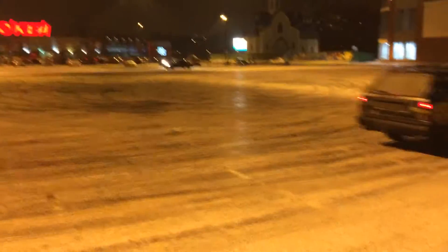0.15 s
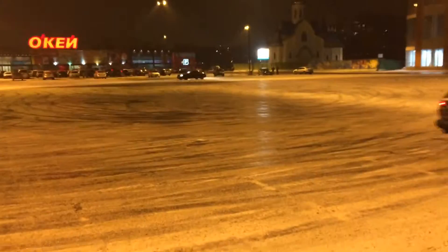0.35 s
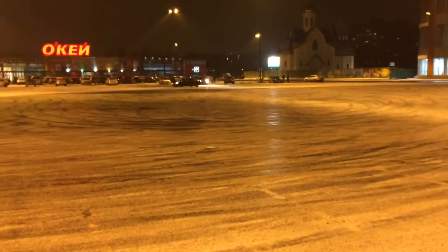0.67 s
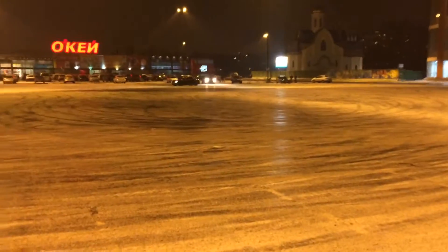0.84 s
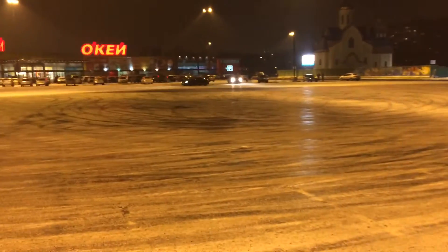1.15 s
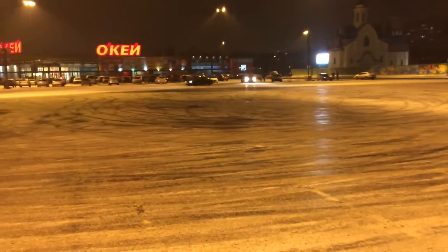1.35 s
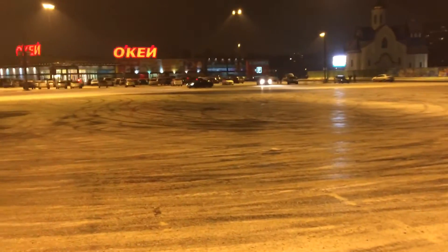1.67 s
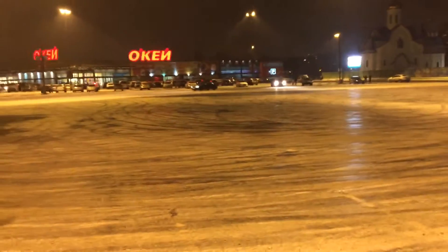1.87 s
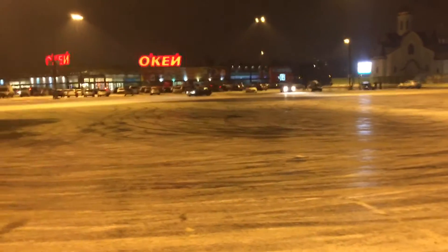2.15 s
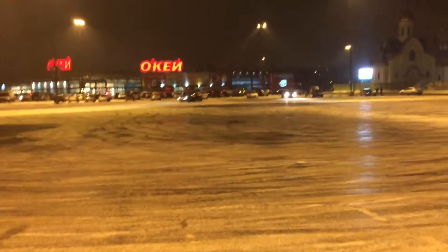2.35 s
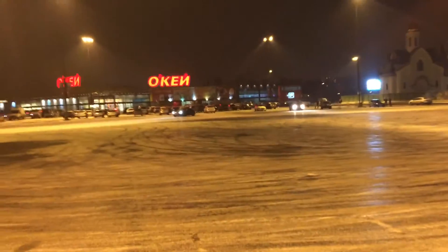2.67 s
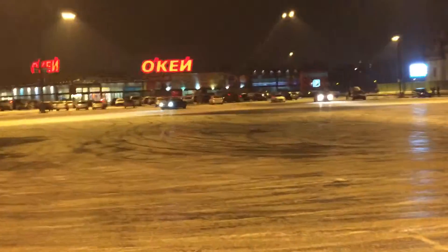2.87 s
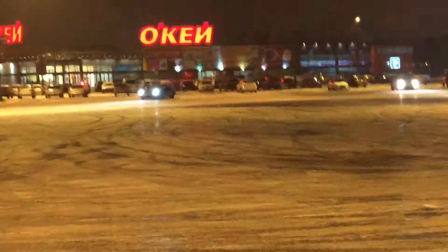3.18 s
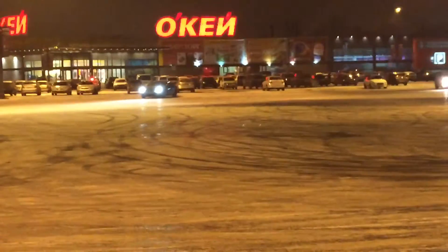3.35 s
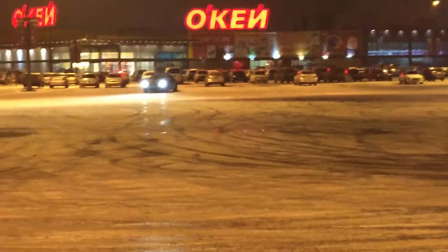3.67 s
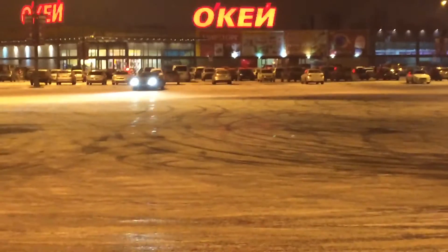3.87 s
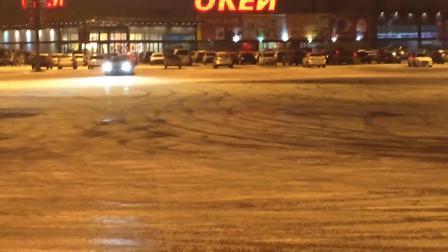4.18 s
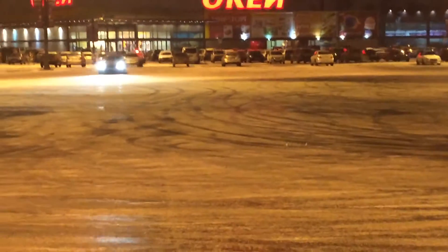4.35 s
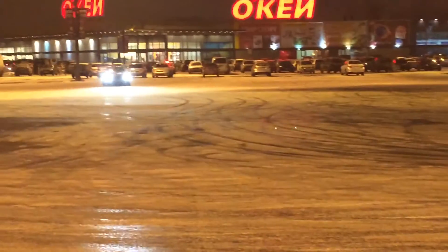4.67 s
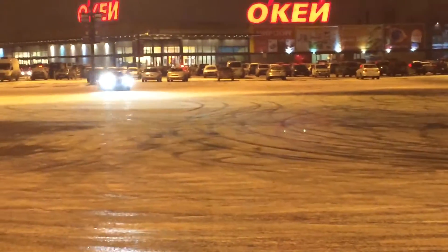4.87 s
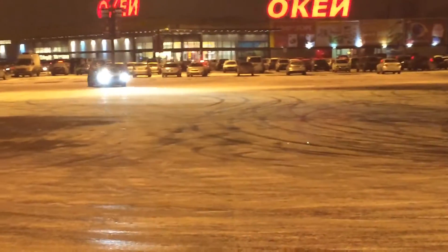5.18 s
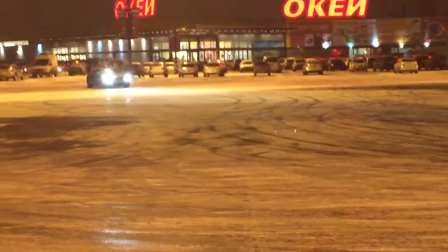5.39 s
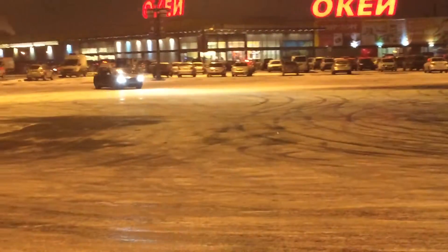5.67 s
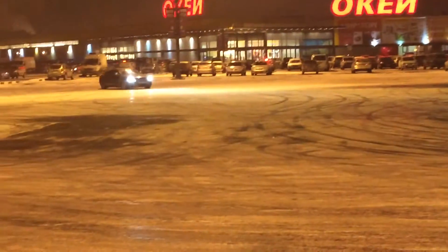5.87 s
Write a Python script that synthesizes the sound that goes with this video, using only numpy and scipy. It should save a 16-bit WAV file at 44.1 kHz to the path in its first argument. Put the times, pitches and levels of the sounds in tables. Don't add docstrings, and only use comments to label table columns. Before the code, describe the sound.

In an open snowy car park, a car slides close past the microphone with burbling exhaust and bright snow spray. The revs sag briefly, then the throttle opens with a rough bark and the engine booms deeper and higher as it moves off. Tyres roar, scrape and crunch over ice, spinning wheels hum, and wind buffets the microphone.

```python
import sys
import numpy as np
from scipy import signal
from scipy.fft import rfft, irfft, next_fast_len
from scipy.io import wavfile

SR = 44100
rng = np.random.default_rng(int(sys.argv[2]) if len(sys.argv) > 2 else 0)


def wav_out(sig):
    wavfile.write(sys.argv[1], SR, np.round(np.clip(np.atleast_2d(sig).T, -1, 1) * 32767).astype(np.int16))


def linear_from_db(decibels):
    return 10 ** (np.asarray(decibels, float) / 20)


N = 265923


def seconds():
    return np.arange(N) / SR


def in_time(rows):
    s, *columns = np.transpose(rows)
    return [np.interp(seconds(), s, column) for column in columns]


def swells(rows):
    t = np.arange(0, N + 64, 64) / SR
    bells = sum(db * np.exp(-((t - s) / width) ** 2) for s, db, width in rows)
    return np.interp(seconds(), t, bells)


def rms_one(x):
    return x / np.sqrt(np.mean(x ** 2) + 1e-20)


def white():
    return rng.standard_normal(N)


def drift(rate):
    pole = np.exp(-80 * np.pi * rate / SR)
    settle = 2000
    steps = rng.standard_normal(N // 40 + settle + 2)
    slow = signal.lfilter([1], [1, -2 * pole, pole * pole], steps)[settle:]
    return np.interp(np.arange(N) / 40, np.arange(len(slow)), rms_one(slow))


def coloured(x, spectrum):
    size = next_fast_len(N)
    hz, level_db = np.transpose(spectrum)
    bins = np.log(np.arange(size // 2 + 1) * SR / size + 1e-3)
    gain = linear_from_db(np.interp(bins, np.log(hz), level_db, left=-90, right=-90))
    return rms_one(irfft(rfft(x, size) * gain, size)[:N])


def patchy(spectrum, patchy_db, grit_db, shared, count, grains=0):
    grit = linear_from_db(grit_db * np.minimum(rng.exponential(1, N), 5)) * white()
    size = next_fast_len(N)
    whole = rfft(coloured(rms_one(grit) + grains, spectrum), size)
    together = drift(21.0)
    place = np.log(np.arange(len(whole)) * SR / size + 1e-3)
    centres = np.linspace(np.log(spectrum[0][0]), np.log(spectrum[-1][0]), count)
    out = 0
    for k in range(count):
        share = np.interp(place, centres, np.arange(count) == k)
        band = irfft(whole * share, size)[:N]
        out = out + band * linear_from_db(patchy_db * (shared * together + drift(14.0)))
    return rms_one(out)


def orders(cycle, order, levels_db, flutter_db, slip, scatter=1):
    out = 0
    for k, level_db in zip(order, levels_db):
        start = scatter * rng.uniform(0, 2 * np.pi)
        phase = k * cycle + start + slip * np.sqrt(k) * drift(8.3)
        out = out + linear_from_db(level_db + flutter_db * drift(6.0)) * np.sqrt(2) * np.sin(phase)
    return out


# frequency in Hz, level in dB per Hz.
MIC_HISS = [(4000, -5.5), (7000, -4.5), (11000, -5.5), (16000, -12)]


def mic_hiss():
    return linear_from_db(-74.5) * coloured(white(), MIC_HISS)


# frequency in Hz, level in dB per Hz.
FAR_ROAD = [(35, -16), (60, -0.5), (90, 1.5), (125, -3.5), (170, -16.5)]


def far_road():
    return linear_from_db(-36.5) * coloured(white(), FAR_ROAD)


# frequency in Hz, level in dB per Hz.
RUMBLE = [(15, -16.5), (30, 10.5), (55, -9), (90, 7), (150, 12), (220, -17), (350, -33.5)]
# centre in seconds, rise in dB, half width in seconds.
GUSTS = [
    (.5, 4, .2),
    (1.13, 8, 0.074),
    (1.72, 8, 0.16),
    (2.6, 7, .1),
    (3.3, 10, 0.3),
    (3.75, 0, .1),
    (4.4, 9, 0.088),
    (5.03, 8, .1),
    (5.7, 10, .1),
]


def wind():
    lull_s, lull_db_per_s = 4.5, 4
    lull_db = lull_db_per_s * np.maximum(seconds() - lull_s, 0)
    wind_db = -34 + swells(GUSTS) - lull_db
    return linear_from_db(wind_db - 3.0) * patchy(RUMBLE, 0.73, 0.1, shared=1.0, count=5)


# frequency in Hz, level in dB per Hz.
DRONE = [(150, 9.5), (200, 3), (300, -2), (450, -0.5), (650, -6.5), (900, -1.5)]


def body_drone(slide_db, pipe_db):
    body = linear_from_db(-40.5 + 0.1 * slide_db) + linear_from_db(pipe_db - 28)
    return body * linear_from_db(1.0) * patchy(DRONE, 0.45, 0.1, shared=0.81, count=4)


# start in seconds, peak level in dB.
ICE_TICKS = [(.127, -46), (.158, -45), (.403, -49), (.8285, -42), (.9227, -51), (1.683, -48), (1.721, -50),
             (1.843, -49), (1.994, -51), (2.139, -51), (2.166, -50), (2.338, -52)]


def ice_ticks():
    clicks = np.zeros(N)
    for s, peak_db in ICE_TICKS:
        clicks[round(s * SR)] = linear_from_db(peak_db - 11.5)
    decay_s = 0.004
    puff = signal.lfilter([1], [1, -np.exp(-1 / (decay_s * SR))], clicks + 1e-18)
    band = signal.butter(4, [11200, 14200], "band", fs=SR, output="sos")
    return puff * rms_one(signal.sosfilt(band, white()))


def creaks(per_s, cycles, low_hz, high_hz):
    clicks = (rng.random(N) < per_s / SR) * white()
    dealt = rng.integers(0, 30, N)
    out = 0
    for k, hz in enumerate(np.geomspace(low_hz, high_hz, 30)):
        r = linear_from_db(-60 * hz / (cycles * SR))
        w = 2 * np.pi * hz / SR
        ring = [1, -2 * r * np.cos(w), r * r]
        out = out + hz * signal.lfilter([0, np.sin(w)], ring, clicks * (dealt == k) + 1e-18)
    return rms_one(out)


def ground_echo(x, echo_db):
    lag_ms = 0.92 + 0.09 * seconds()
    return x + linear_from_db(echo_db) * np.interp(np.arange(N) - lag_ms * SR / 1000, np.arange(N), x)


# time in seconds, slide level in dB, wheelspin (snow thrown up) in dB.
SNOW = [(0, -29.5, 9.5), (.15, -30, 9), (.45, -31.5, 1.5), (.9, -34.5, 1), (1.55, -30.5, -2),
        (1.75, -29.5, 1.5), (2.1, -32, -1), (2.4, -29.5, -4), (2.7, -24.5, 0), (2.88, -28.5, 1),
        (3.2, -27.5, 1), (3.82, -28.5, -1.5), (4.15, -26, -0.5), (4.45, -24.5, -5), (4.65, -29.5, -3),
        (4.8, -26, -6), (5.62, -24.5, -2), (6.03, -29, -1)]
# centre in seconds, rise in dB, half width in seconds.
FLUNG = [(.1, 0.5, 0.036), (.3, 3.5, 0.027), (.405, 8, .01), (.82, 6.5, .015), (1.2, 3, .03),
         (1.31, 0, 0.025), (1.69, 4, 0.064), (1.845, 0, .015), (1.98, 4, 0.033), (2.16, 6, 0.032),
         (2.35, 4.5, .02), (2.52, 4, 0.012), (3.33, 3, .04), (3.62, 5, 0.018), (4.02, 3, 0.022),
         (5.77, 4, .03)]
# centre in seconds, rise in dB, half width in seconds.
CRUNCHES = [
    (.1, 7.5, 0.047),
    (.33, 3, .05),
    (.98, 5, 0.015),
    (1.35, 1, 0.11),
    (2.53, 0, 0.04),
    (2.77, 4, 0.021),
    (4.1, 4.5, 0.066),
    (5.62, 4.5, 0.076),
]
# frequency in Hz, level in dB per Hz.
ROAR = [(290, -40.5), (500, -21), (619, -12), (963, -2), (1510, -2), (1870, -7), (2160, -12.5),
        (2600, -16.5), (3380, -39), (5720, -120)]
SCRAPE = [(1700, 12), (2200, -5.5), (2800, -3), (3500, -8.5), (4500, -35)]
SPRAY = [(2800, -3), (3800, 0), (5000, -6.5), (6500, -11.5), (8500, -19.5), (11000, -27.5)]
FINE = [(5000, -1), (8000, 0.5), (11000, -3), (15000, -9), (17000, -17.5)]


def tyres_in_snow(cycle):
    snow_db, spin_db = in_time(SNOW)
    slide_db = snow_db + 30
    flung_db, crunch_db = swells(FLUNG), swells(CRUNCHES)
    roar_db = snow_db + 0.3 * crunch_db + 0.28 * flung_db
    scrape_db = -41.5 + 0.98 * slide_db + 0.35 * spin_db + 1.15 * crunch_db
    spray_db = -50.5 + 0.45 * slide_db + 0.52 * spin_db + 0.36 * flung_db
    fine_db = -66 + 0.15 * slide_db + 1.1 * spin_db + flung_db
    creak = creaks(per_s=2500.0, cycles=132.0, low_hz=796.6, high_hz=6515.0)
    pulsing = 1 + 0.13 * np.sin(5 * cycle)
    roar = patchy(ROAR, 0.76, 3.33, shared=1.0, count=6, grains=0.22 * creak)
    roar = linear_from_db(roar_db - 0.34) * pulsing * roar
    scrape = linear_from_db(scrape_db - 2.36) * patchy(SCRAPE, 0.96, 0.62, shared=0.67, count=3, grains=0.27 * creak)
    spray = linear_from_db(spray_db + 1.5) * patchy(SPRAY, 0.85, 1.5, shared=0.36, count=4, grains=0.27 * creak)
    fine = linear_from_db(fine_db + 4.0) * patchy(FINE, 1.0, 2.0, shared=0.15, count=5)
    return ground_echo(roar + scrape + spray, echo_db=-36.5) + fine, slide_db


# time in seconds, pitch in Hz, level in dB.
WHEEL_HUM = [(1.0, 94.7, -67), (1.2, 80.35, -39), (1.5, 43.7, -25), (1.62, 43.63, -32),
             (1.95, 91.56, -24.5), (2.1, 95.7, -27), (2.55, 55.77, -31), (2.8, 45.05, -35),
             (3.6, 52.9, -42), (3.75, 44.94, -36), (4.05, 66, -37), (4.2, 77.55, -27), (4.65, 108, -45),
             (4.8, 128, -31), (4.95, 124.3, -32), (5.1, 107, -37), (5.3, 109, -60)]


def wheels():
    hum_hz, hum_db = in_time(WHEEL_HUM)
    phase = 2 * np.pi * np.cumsum(hum_hz) / SR + 0.2 * drift(21.0)
    inside = np.abs(seconds() - 3.15) < 2.15
    return inside * linear_from_db(hum_db + 0.44 * drift(6.1)) * np.sqrt(2) * np.sin(phase)


# frequency in Hz, level in dB per Hz.
BARK_COLOUR = [(170, -22), (230, 1), (300, 0), (360, -11.5), (450, -32.5)]


def bark(cycle):
    bark_s, rise_db_per_s, fall_db_per_s = 0.88, 208, 65
    after = seconds() - bark_s
    bark_db = -37 + np.minimum(rise_db_per_s * after, -fall_db_per_s * after)
    puffs = (1 + np.sin(5 * cycle)) * white()
    return linear_from_db(bark_db) * coloured(puffs, BARK_COLOUR)


# time in seconds, firing rate in Hz, load in dB, tailpipe level in dB (how directly
# the pipe faces the microphone), throttle bite in dB.
ENGINE = [(0, 76.3, -29, -24, 5), (.36, 74.6, -37, -25, 12), (.6, 69, -33, -27.5, 0),
          (.8, 79.74, -33, -20.5, 9), (.87, 82.7, -19, -22, 8), (1.38, 96.62, -17, -29.5, -0.5),
          (1.58, 105.8, -14.5, -34.5, 5), (1.95, 124.3, -11, -38.5, 0), (2.2, 122.6, -15, -50.5, -1.5),
          (2.75, 110.7, -18.5, -49, -4.5), (3.3, 114.7, -18, -45.5, -16), (3.7, 111.9, -17.5, -48, 0),
          (4.3, 121.3, -15.5, -46, -6), (4.65, 132.5, -20.5, -68, 3), (4.95, 132.2, -15, -47, -1),
          (5.22, 135.4, -15, -55, -0.5), (5.7, 158.8, -16.5, -59, 4), (6.03, 167.2, -18, -50, -1.5)]
# centre in seconds, depth in dB, half width in seconds.
FADES = [(1.2, 7, 0.024), (1.3, -1, 0.0092), (2.49, 5, 0.023), (2.86, 3, 0.014), (3.03, 4, 0.038),
         (3.39, 10, 0.034), (3.58, 7, 0.035), (3.77, 4.5, 0.048), (3.93, 2.5, .06), (4.17, 2, 0.061),
         (4.32, 8, 0.015), (4.41, 0, 0.013), (4.62, 3.5, 0.055), (4.85, 8, 0.04), (4.95, 10, 0.043),
         (5.34, 10, 0.042), (5.48, 11, 0.032), (5.6, 9.5, 0.018), (5.73, 9.5, 0.022), (5.85, 6.5, 0.033)]


def engine_cycle(firing_hz):
    return 1.1 + 2 * np.pi * np.cumsum(firing_hz) / SR / 5


def engine(cycle, firing_hz, load_db, pipe_db, bite_db):
    swell_db, sink_db = swells([(0.62, 5.9, 0.29)]), swells([(0.76, 8, 0.17)])
    choke_db = 0.31 * (load_db + 35.5)
    fast_hz = np.maximum(firing_hz - 100, 0)

    firing = linear_from_db(load_db - swells(FADES) - 1.1)
    boom = firing * orders(cycle, (5,), [0], flutter_db=0.7, slip=0.07)
    low = orders(cycle, (2.3, 3, 4.4), [-35, -29.5, -18.5], flutter_db=6.5, slip=0.51)
    boom = boom + linear_from_db(load_db - 4.5) * low

    over = linear_from_db(pipe_db - 2 - sink_db) + linear_from_db(load_db - 23 + 0.98 * bite_db)
    boom = boom + over * orders(cycle, (10,), [-1.5], flutter_db=1.73, slip=0.06, scatter=0)
    third = linear_from_db(load_db - 35 + 1.6 * bite_db + 1.5 * sink_db)
    boom = boom + third * orders(cycle, (15, 16), [0, -6], flutter_db=2.5, slip=0.1)
    fourth = linear_from_db(load_db - 35 + 0.42 * bite_db)
    boom = boom + fourth * orders(cycle, (20, 21), [0, -1.5], flutter_db=3.3, slip=0.04)

    burble = orders(cycle, (7.9, 8), [-8.5, 1.5], flutter_db=0.9, slip=0.07, scatter=0)
    boom = boom - linear_from_db(pipe_db) * burble
    uneven = linear_from_db(-46) + linear_from_db(load_db - 11 - 0.41 * fast_hz)
    boom = boom + uneven * orders(cycle, (3, 6), [-9, 1.5], flutter_db=1.0, slip=0.076)
    side = linear_from_db(-7 + 0.87 * pipe_db - sink_db - choke_db) + linear_from_db(load_db - 43)
    side_orders = orders(cycle, (11, 11, 13), [-1.5, -12.5, -12], flutter_db=1.5, slip=0.07, scatter=0)
    boom = boom + side * side_orders

    ninth = linear_from_db(pipe_db - 7.5 + swell_db - choke_db)
    off_peak_hz = np.abs(firing_hz - 109.4)
    ninth = ninth + linear_from_db(load_db - 27.5 + 1.4 * bite_db - 0.4 * off_peak_hz)
    return boom + ninth * orders(cycle, (9,), [0], flutter_db=2.0, slip=0.07, scatter=0)


def scene():
    firing_hz, load_db, pipe_db, bite_db = in_time(ENGINE)
    cycle = engine_cycle(firing_hz)
    snow, slide_db = tyres_in_snow(cycle)
    background = mic_hiss() + far_road() + wind()
    car = body_drone(slide_db, pipe_db) + ice_ticks() + snow + wheels()
    exhaust = bark(cycle) + engine(cycle, firing_hz, load_db, pipe_db, bite_db)
    return (background + car + exhaust)[None]


def low_pass(x):
    return signal.sosfilt(signal.butter(12, 15180, fs=SR, output="sos"), x)


def record(dry):
    opening = np.minimum(seconds() / 0.002, 1)
    rounded = 0.85 * np.tanh(opening * dry / 0.85)
    return low_pass(rounded)


dry = scene()
out = record(dry)
wav_out(out)
```